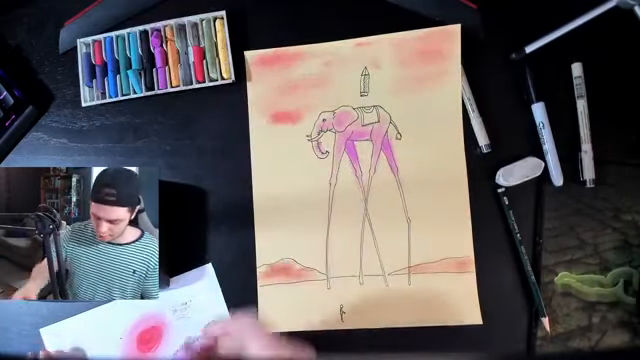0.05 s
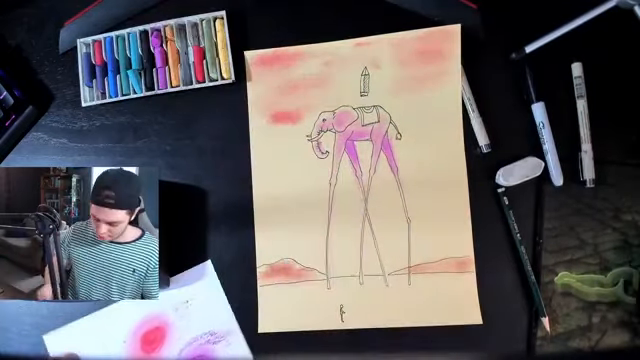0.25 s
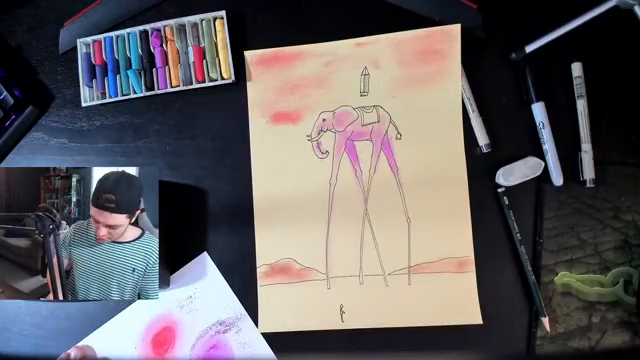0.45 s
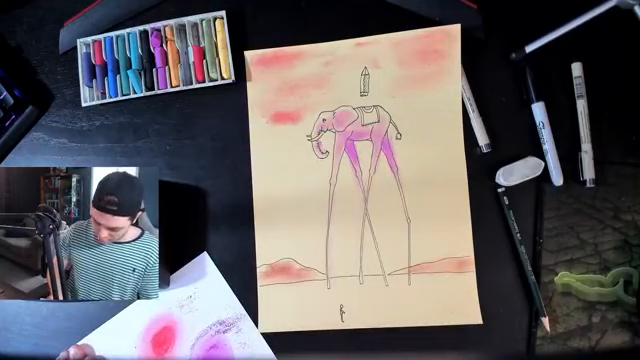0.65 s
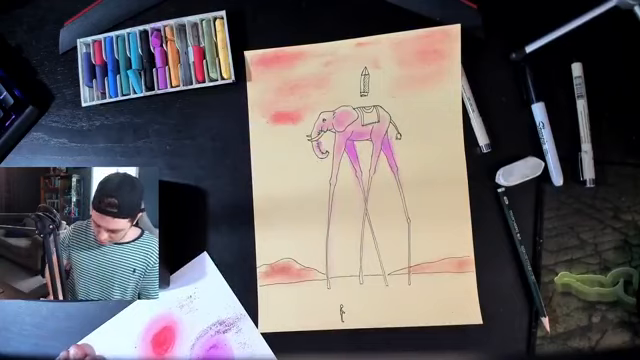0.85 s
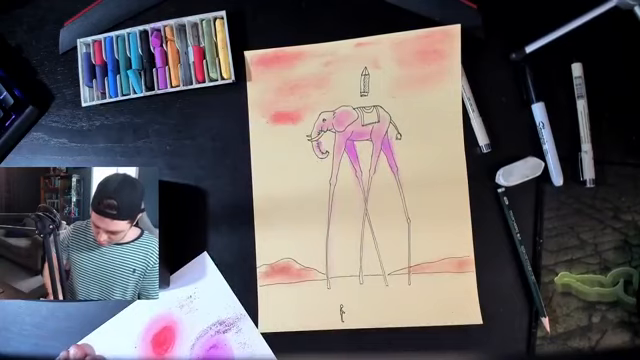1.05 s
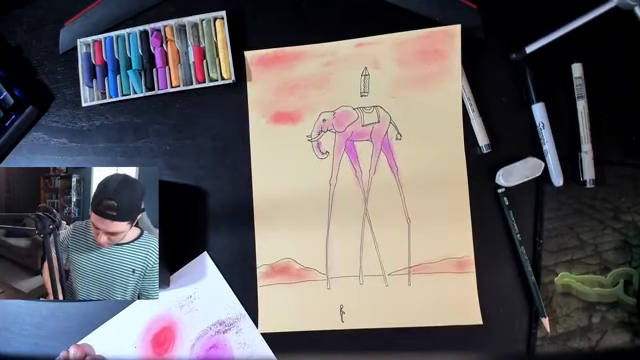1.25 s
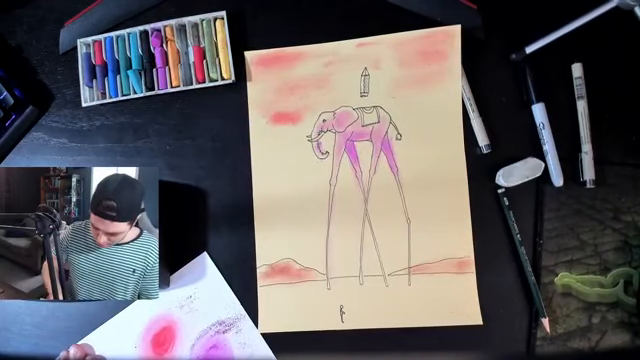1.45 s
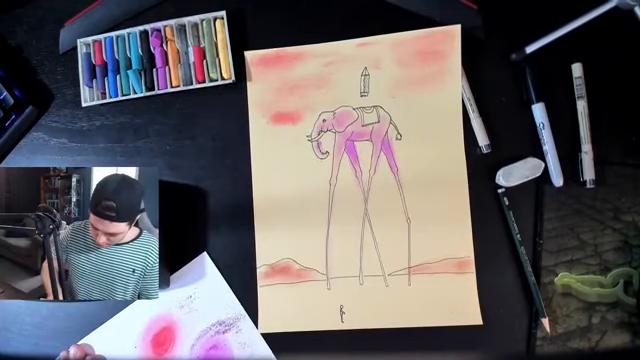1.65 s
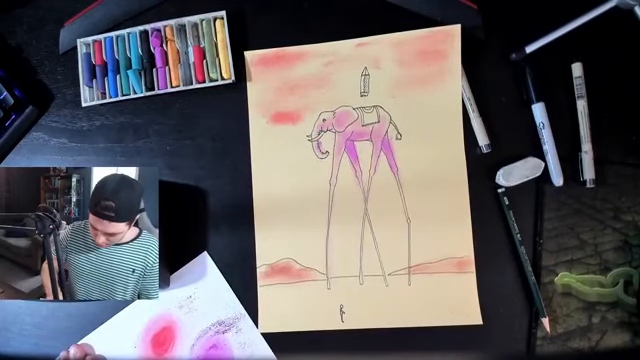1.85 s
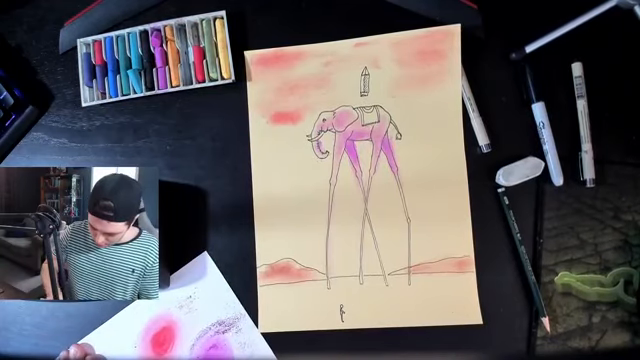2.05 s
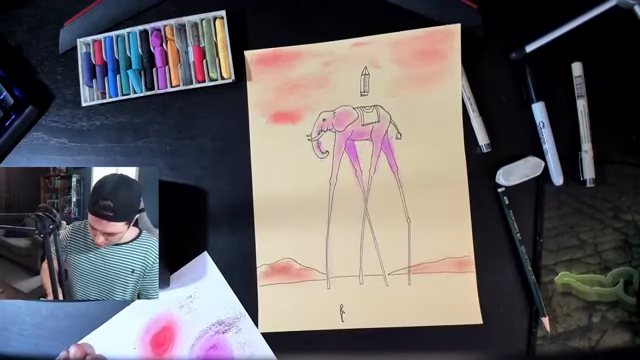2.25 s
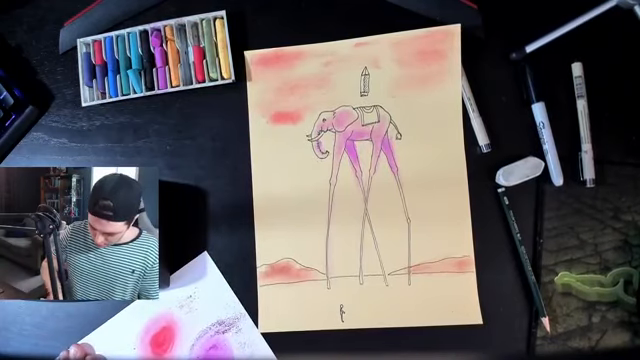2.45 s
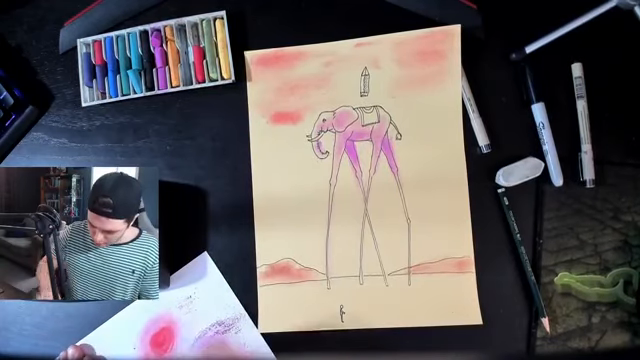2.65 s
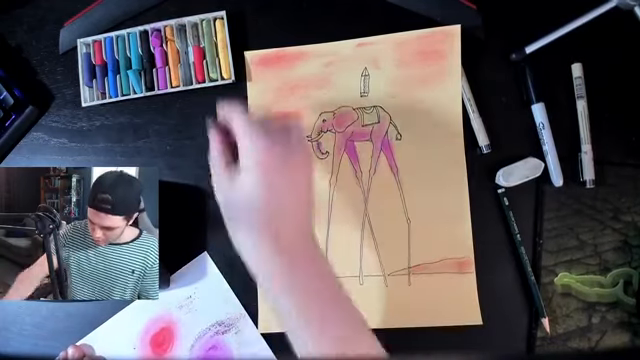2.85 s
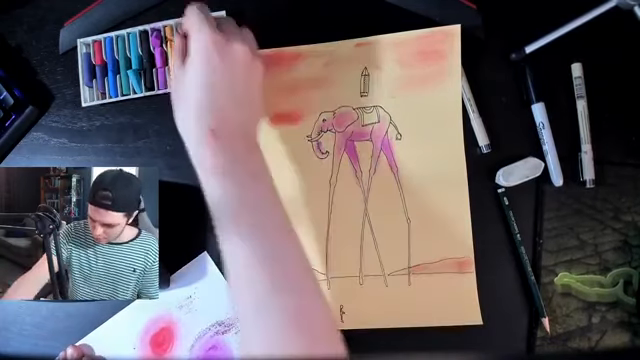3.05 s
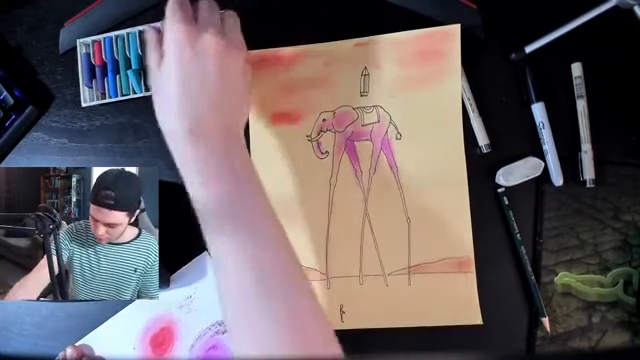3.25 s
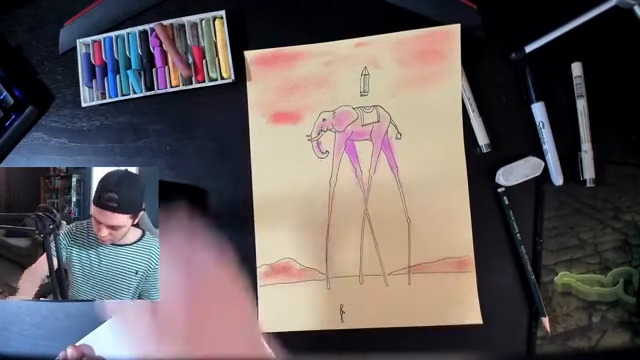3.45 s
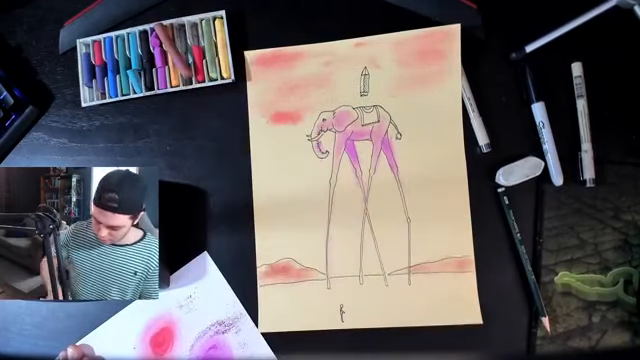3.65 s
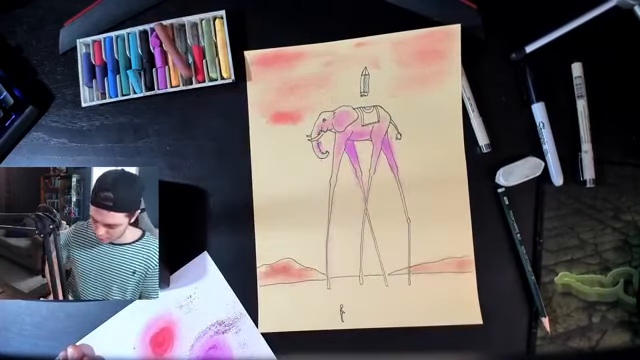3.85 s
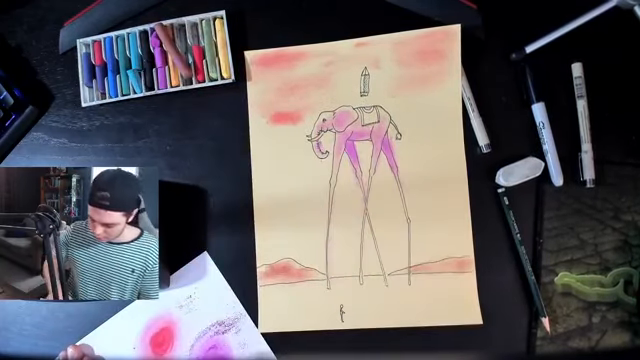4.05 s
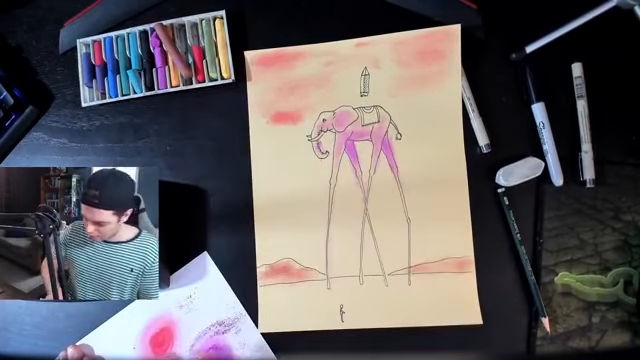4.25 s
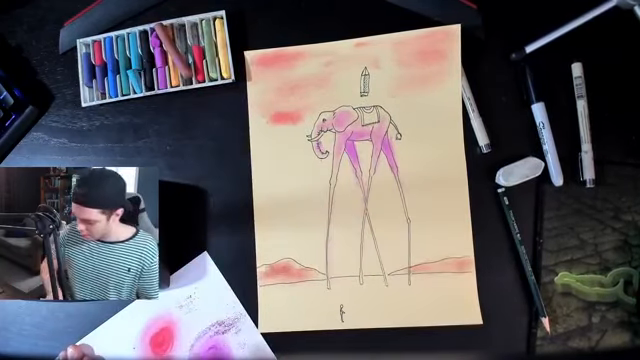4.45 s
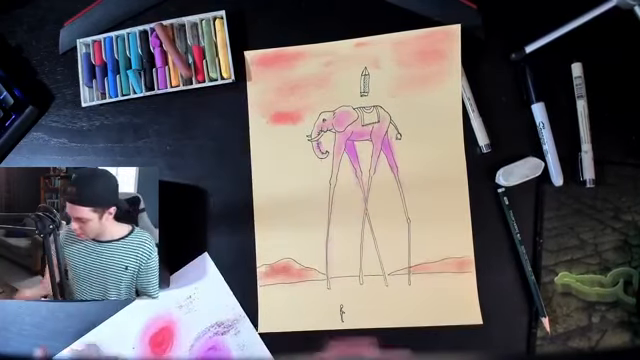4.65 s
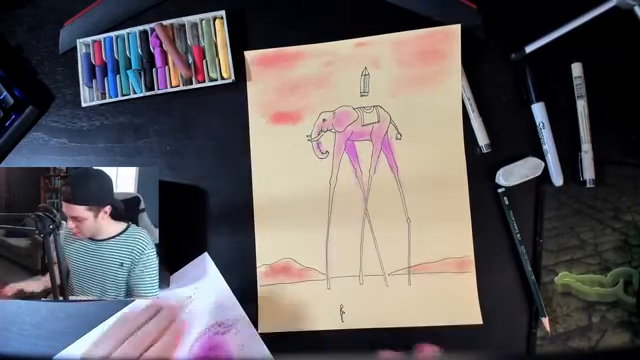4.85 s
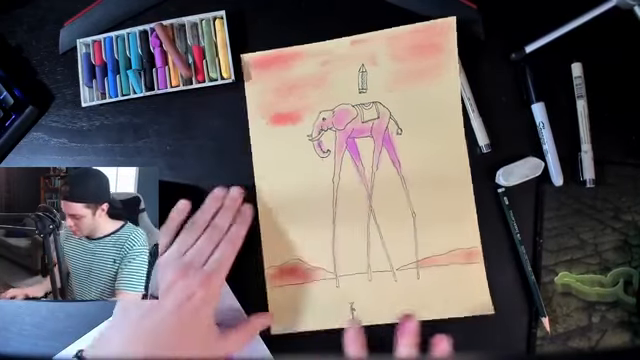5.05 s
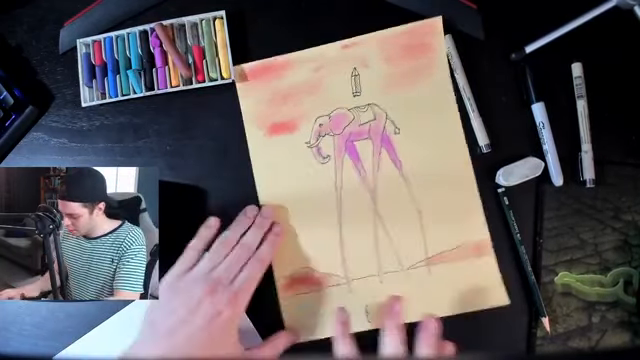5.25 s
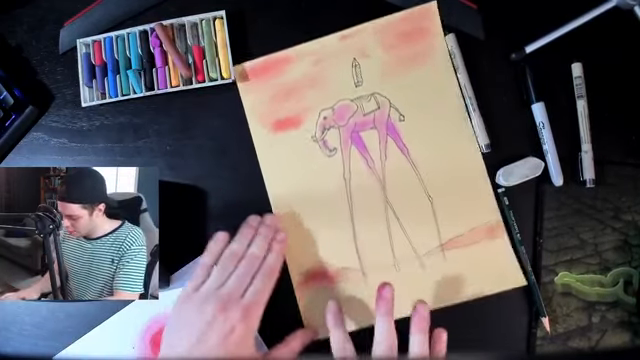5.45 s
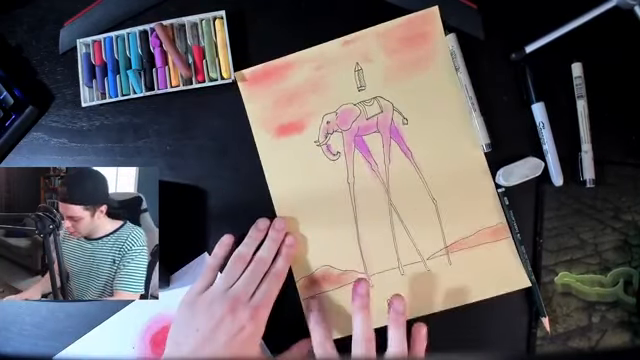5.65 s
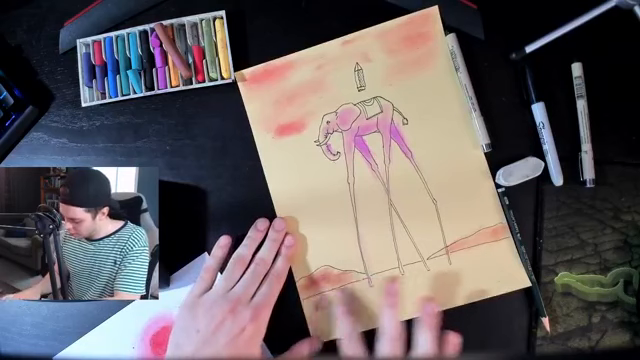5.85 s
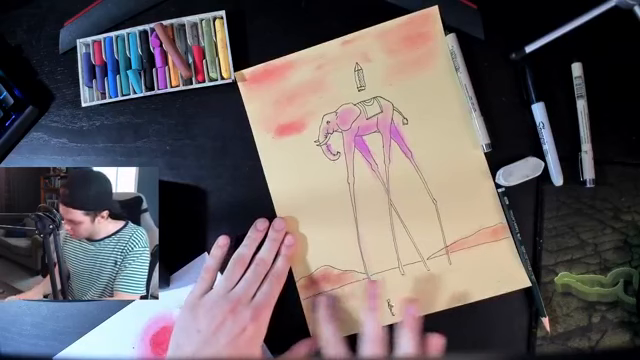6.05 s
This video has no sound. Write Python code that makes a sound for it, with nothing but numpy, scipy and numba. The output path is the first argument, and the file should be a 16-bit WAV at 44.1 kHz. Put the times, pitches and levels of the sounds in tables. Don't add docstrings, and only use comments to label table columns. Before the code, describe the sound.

A small quiet room, heard close to a desk, with a very faint fan and motor drone underneath. Around 0.25-0.6 s a sheet shifts with a soft dry scuff. From 0.6 to 2.6 s a chalky stick shades paper in rapid back-and-forth strokes, roughly eleven or twelve per second, starting faint and growing firmer and brighter; the scratchy grit carries a woody desk resonance, alternating higher and lower, with little knocks and ticks. A near-silent gap follows, with a tiny scuff at 2.84 s. At 3.2 s the stick touches its box, then cracks loudly at 3.25 s and bounces in a hollow, bright rattle, dying by 3.6 s. From 3.8 to 4.6 s a fingertip smudges in soft, airy, quick hisses, ending in a small flick and tick. From 5.04 s the sheet is turned, sliding in jerks with crisp creases and papery buckling, lighter toward 6 s.

```python
import sys
import numpy as np
from scipy import signal
from scipy.fft import rfft, irfft
from scipy.io import wavfile
from scipy.ndimage import uniform_filter1d, map_coordinates
from numba import njit

SR = 44100
rng = np.random.default_rng(int(sys.argv[2]) if len(sys.argv) > 2 else 0)


def materialize(psi):
    bounded = np.clip(np.atleast_2d(psi).T, -1, 1)
    quanta = np.round(bounded * 32767).astype(np.int16)
    wavfile.write(sys.argv[1], SR, quanta)


def boost_factor(decibels):
    exponent = np.asarray(decibels, float) / 20
    return 10 ** exponent


N = 269186


def unit(x):
    return x / np.sqrt(np.mean(x ** 2))


def band(x, lo, hi):
    return signal.sosfilt(signal.butter(3, [lo, hi], "band", fs=SR, output="sos"), x)


def body(spectrum, peaks=(), lift_db=8.):
    f = np.arange(1, 4098) * SR / 8194
    hz, db = np.transpose(spectrum)
    power = 1 + sum(boost_factor(gain + lift_db) ** 2 / (1 + (2 * (f - centre) / width) ** 2)
                    for centre, width, gain in peaks)
    colour = boost_factor(np.interp(np.log(f), np.log(hz), db))
    cepstrum = irfft(np.log(colour * np.sqrt(power)))
    cepstrum[1:4096] *= 2
    cepstrum[4097:] = 0
    return irfft(np.exp(rfft(cepstrum)))


def through(x, response):
    return signal.oaconvolve(x, response)[:N]


@njit
def svf(x, hz, q):
    y, bandpass, lowpass = np.empty(len(x)), 0., 0.
    for i in range(len(x)):
        g = np.tan(np.pi * hz[i] / SR)
        v = (bandpass + g * (x[i] - lowpass)) / (1 + g * (g + 1 / q))
        bandpass, lowpass, y[i] = 2 * v - bandpass, lowpass + 2 * g * v, v / q
    return y


def walk(rate):
    hold = int(SR / rate)
    levels = np.repeat(rng.standard_normal(N // hold + 1), hold)
    return 1.3 * uniform_filter1d(uniform_filter1d(levels, hold), hold)[:N]


def wander(x, spread_db, rate, width_hz):
    f, t, z = signal.stft(x, SR, nperseg=512)
    field = rng.standard_normal((200, 200))
    where = np.meshgrid(f / max(width_hz, 150), t * min(rate, 30), indexing="ij")
    patch = map_coordinates(field, where, order=1)
    return signal.istft(z * boost_factor(spread_db * patch), SR)[1][:N]


def swell(s, length):
    i = np.arange(int(s * SR), min(int((s + length) * SR), N))
    return i, np.abs(np.sin(np.pi * (i / SR - s) / length))


def grit(spread_db, patchy_db):
    sizes = boost_factor(spread_db * np.minimum(rng.exponential(size=N), 6))
    slips = rng.standard_normal(N) * sizes
    return unit(slips * boost_factor(patchy_db * (walk(60) + walk(250))))


def strokes(table, soft):
    t, power = np.arange(N) / SR, np.zeros((3, N))
    sheen_bite = 0.28
    for s, length, top, db, press_db, sheen_db in table:
        i = swell(s, length)[0]
        u, top = np.clip((t[i] - s) / length, 0, 1), np.clip(top, .03, .95)
        speed = np.sin(np.pi / 2 * np.where(u < top, u / top, (1 - u) / (1 - top)))
        levels = boost_factor(db + np.array([press_db, 0, sheen_db]))
        power[:, i] += np.outer(levels, speed ** soft) ** 2 * speed ** np.array([[0], [0], [sheen_bite]])
    return np.sqrt(power)


def rub(tooth, response, low, mid, high):
    steady, out = through(tooth, response), 0
    for gain, lo, hi in ((low, 500, 2550), (mid, 2550, 7250), (high, 7250, 17000)):
        out = out + band(through(tooth * gain, response), lo, hi) / np.std(band(steady, lo, hi))
    return out


def resonant_swells(table, q, skirt_q):
    tooth, out = grit(2.3, 0.79), np.zeros(N)
    for s, length, hz, db in table:
        i, shape = swell(s, length)
        centre = np.full(len(i), 1. * hz)
        tone = unit(svf(svf(tooth[i], centre, 1. * q), centre, 1. * skirt_q))
        out[i] += boost_factor(db) * np.sqrt(shape) * tone
    return out


def struck(events, modes, push_s):
    out, t = np.zeros(N + SR), np.arange(SR // 6) / SR
    for s, db in events:
        ring = 0
        for (hz, gain, t60), m in zip(modes, rng.standard_normal((len(modes), 2))):
            tone = np.sin(2 * np.pi * hz * (1 + 0.039 * m[1]) * t)
            ring = ring + boost_factor(gain + 5.5 * m[0]) * tone * 1000. ** (-t / t60)
        ring = ring * (1 - np.exp(-t / push_s))
        out[int(s * SR):int(s * SR) + len(t)] += boost_factor(db) * ring / np.abs(ring).max()
    return out[:N]


def bursts(events):
    shape, t = np.zeros(N + SR), np.arange(SR // 2) / SR
    for s, db, t60 in events:
        shape[int(s * SR):int(s * SR) + len(t)] += boost_factor(db) * 1000. ** (-t / max(t60, .003))
    return shape[:N] * rng.standard_normal(N)


# (frequency [Hz], level [dB])
RUMBLE = [(15, -11), (60, -17), (100, -27), (145, -13)]
# (frequency [Hz], level [dB])
HUSH = [(140, -30), (230, -6), (265, -6.5), (444, -5), (502, -8), (902, -8), (1290, -12), (1380, -15),
        (1870, -17), (2190, -20), (5000, -27), (16000, -35)]
# (frequency [Hz], width [Hz], level [dB])
FAN = [(115, 6.8, 5), (177, 6, -3), (214, 11, -3), (342, 27, -9.5), (440, 10, -5.5), (598, 3.9, 1)]
# (frequency [Hz], peak level [dB])
MOTOR = [(175.8, -73), (122, -81)]


def hush():
    air = through(rng.standard_normal(N), body(RUMBLE + HUSH[1:], FAN, lift_db=12.0))
    t, motor = np.arange(N) / SR, 0
    for hz, db in MOTOR:
        level = boost_factor(db + 1.0 * walk(11))
        motor = motor + level * np.sin(2 * np.pi * hz * t + 0.3 * walk(8.))
    return boost_factor(-71.5 + 0.5 + 0.58 * walk(2.3)) * unit(air) + motor


# (start [s], duration [s], share to top speed [-], level [dB], pressure [dB])
DRAGS = [(0.0, 0.15, 0.12, -72, -9), (0.236, 0.055, 0.25, -70, 0.5), (0.255, 0.27, 0.27, -53.5, -3.5),
         (0.358, 0.27, 0.37, -60, -1.5), (2.568, 0.1, 0.17, -65, -2), (3.18, 0.022, 0.56, -67, -10),
         (5.036, 0.1, 0.056, -49.5, -20), (5.098, 0.19, 0.26, -51, -37), (5.257, 0.14, 0.35, -48.5, -20),
         (5.318, 0.14, 0.45, -44.5, -20.5), (5.401, 0.13, 0.35, -56, -24), (5.494, 0.048, 0.36, -48.5, -19),
         (5.47, 0.26, 0.27, -57.5, -17), (5.639, 0.16, 0.15, -77, -14.5), (5.844, 0.15, 0.54, -56, -7),
         (5.986, 0.13, 0.2, -55, -11)]
# (frequency [Hz], level [dB])
SHEET = [(530, -43.5), (900, -19), (1040, -16), (1600, -16.5), (2220, -6.5), (3000, -2.5), (3680, -4.5),
         (6250, 2.5), (6800, 0), (11700, -11.5), (16000, -31.5)]


def sheet():
    sheen_db = -2.5
    gains = strokes([(*row, sheen_db) for row in DRAGS], soft=1.75)
    return wander(rub(grit(2.3, 0.79), body(SHEET), *gains), 1.9, 7.8, 590.0)


# (start [s], duration [s], frequency [Hz], level
# [dB])
NARROW_SWELLS = [(0, 0.17, 9500, -77.5), (2.837, 0.028, 1780, -72), (2.838, 0.032, 4370, -79),
                 (2.803, 0.01, 9200, -82), (2.99, 0.01, 9300, -83), (3.096, 0.014, 6980, -78),
                 (3.096, 0.016, 3500, -78), (3.595, 0.16, 3500, -85), (3.53, .035, 600, -60),
                 (3.575, .12, 590, -68), (3.44, .09, 1450, -56), (3.5, .12, 1600, -62), (3.6, 0.17, 1650, -70),
                 (3.56, .12, 1000, -66), (3.33, .03, 1150, -50), (3.68, .08, 700, -72),
                 (4.272, 0.054, 1270, -67.5), (3.8, .1, 2920, -76.5), (4.1, .4, 2360, -76),
                 (5.02, .035, 1400, -73), (4.633, 0.063, 1390, -64.5), (4.927, 0.084, 1377, -71),
                 (3.79, .06, 6800, -76), (4.01, .07, 6300, -66), (4.02, .08, 9700, -67), (4.13, .08, 9300, -64),
                 (4.24, .07, 9400, -63), (4.345, .065, 9300, -59), (4.33, .05, 5000, -66), (4.435, .06, 9200, -63),
                 (4.66, .06, 4200, -70), (4.693, .013, 2600, -62), (4.643, .014, 6700, -60)]
# (start [s], duration [s], frequency [Hz], level [dB])
SHEENS = [(0, .12, 13000, -82), (4.13, .09, 14000, -74), (4.24, .075, 14000, -72), (4.34, .075, 14000, -70),
          (4.44, .065, 14000, -70.5), (4.535, .045, 14000, -78), (5.5, .16, 12000, -75),
          (5.86, 0.11, 13000, -68), (5.99, 0.11, 12900, -69), (3.186, .013, 6500, -58),
          (3.604, .012, 11000, -79), (3.561, .012, 11000, -77)]


def noise_swells():
    return resonant_swells(NARROW_SWELLS, q=8., skirt_q=8.) + resonant_swells(SHEENS, q=2.7, skirt_q=.6)


# (time [s], peak level [dB])
TICKS = [(0.019, -33), (0.2456, -32.5), (1.4344, -34), (1.5275, -28), (1.6067, -30), (1.946, -28),
         (2.2837, -28), (2.8404, -45), (3.1024, -62), (4.4444, -29), (4.6462, -24.5), (4.681, -39),
         (4.6986, -30), (5.0404, -23), (5.0604, -25), (5.1397, -41), (5.215, -29.5), (5.2949, -38),
         (5.3194, -30), (5.362, -26), (5.3915, -24), (5.503, -27), (5.6406, -32), (5.8576, -38),
         (5.9958, -31)]


def creases():
    return band(bursts([(s, db - 19.0, 0.024) for s, db in TICKS]), 1600, 9000)


# (start [s], duration [s], frequency [Hz], level [dB])
BUCKLES = [(0.267, 0.32, 4530, -61.5), (0.269, 0.14, 4000, -56), (5.049, 0.66, 11600, -68.5),
           (5.04, 0.066, 3070, -63), (5.13, 0.06, 3100, -51.5), (5.135, 0.046, 2500, -56.5),
           (5.278, 0.142, 5900, -49), (5.28, 0.07, 4700, -58.5), (5.35, 0.074, 4300, -57),
           (5.495, 0.035, 5700, -55), (5.501, 0.051, 3020, -58.5), (5.605, 0.075, 2550, -66),
           (5.618, 0.085, 5200, -59), (5.72, 0.07, 5070, -82), (5.849, 0.12, 8600, -57.5),
           (5.856, 0.14, 5080, -65.5), (5.99, 0.11, 2950, -64.5), (5.989, 0.089, 8500, -54.5),
           (5.87, 0.11, 2760, -75), (5.995, 0.084, 5060, -67), (5.625, .04, 4650, -64),
           (5.24, .05, 6300, -59), (5.3, .04, 4700, -58), (5.525, 0.04, 3250, -61), (5.36, .07, 3150, -56),
           (5.28, .05, 6400, -56), (5.355, .06, 6450, -54), (5.4, .06, 2140, -71), (5.56, .14, 8240, -66)]


def buckles():
    return resonant_swells(BUCKLES, q=9., skirt_q=.6)


# (time [s], peak level [dB], thump [dB], ring [dB])
BUMPS = [(0.288, -62.5, 3, 20), (0.563, -38, -23, -7), (1.011, -54, -17.5, 18), (0.574, -46, -23, -14),
         (1.257, -44, -18.5, -2), (1.451, -48.5, -32, 22), (1.606, -56, 4, 33), (1.631, -48, -20, 5),
         (1.687, -53, -13, -6), (1.769, -63.5, 5.5, 30), (1.805, -43.5, -19, 2), (1.936, -65, 0, 12),
         (1.977, -45, -19, 12), (2.12, -48.5, -37, 32.5), (2.128, -36.5, -10, 21.5),
         (2.213, -49.5, -24.5, -15), (2.28, -43, -18, 2), (2.379, -67.5, -13, -3), (2.473, -45.5, -18, 3),
         (2.56, -46, -30, -5)]
# (frequency [Hz], level [dB], t60 [s])
BUMP_MODES = [(335, -10, 0.08), (435, -12.5, 0.071), (697, -13, 0.057), (881, -7, 0.063), (1057, -6, 0.062)]
# (frequency [Hz], level [dB], t60 [s])
RING_MODES = [(1282, -2, 0.075), (1546, 0, 0.088), (1820, -7, 0.031), (2910, -2, 0.018)]
# (frequency [Hz], level [dB], t60 [s])
THUMP_MODES = [(40, -6, 0.12), (128.3, 10, 0.093)]


def bumps():
    knock = struck([(s, db - 3.0) for s, db, _, _ in BUMPS], BUMP_MODES, push_s=0.00091)
    crunch = band(bursts([(s, db + 8.0, .065) for s, db, _, _ in BUMPS]), 550, 1490)
    thump = struck([(s, db + rel) for s, db, rel, _ in BUMPS], THUMP_MODES, push_s=0.011)
    ring = struck([(s, db + rel - 9) for s, db, _, rel in BUMPS], RING_MODES, push_s=0.00034)
    return knock + crunch + thump + ring


# (start [s], share to top speed [-], level [dB], pressure [dB])
STROKES = [(0.561, 0.62, -73, 5.5), (0.631, 0.59, -64, 1), (0.695, 0.28, -58, 2), (0.795, 0.2, -50, -4.5),
           (0.876, 0.5, -49, -4.5), (0.998, 0.5, -49.5, -1), (1.075, 0.67, -50, -6),
           (1.203, 0.42, -48.5, -1.5), (1.313, 0.57, -47.5, -7.5), (1.411, 0.51, -48, -3),
           (1.505, 0.34, -45.5, -12.5), (1.601, 0.2, -45, 0), (1.673, 0.52, -47.5, -8),
           (1.763, 0.3, -46, -1), (1.842, 0.34, -47.5, -3.7), (1.938, 0.22, -44.5, -1),
           (2.019, 0.36, -45, -6), (2.107, 0.36, -40.5, -1.5), (2.186, 0.34, -45, -14),
           (2.278, 0.27, -45.5, -9.5), (2.361, 0.45, -45.5, -6), (2.442, 0.58, -43, -11),
           (2.522, 0.35, -39.5, -11.5)]
# (frequency [Hz], level [dB])
STICK = [(290, -36), (500, -16), (1030, -1.5), (1260, -5), (2130, -9), (2360, -1), (2570, -12), (4400, -14),
         (9220, -17), (16000, -37)]
# (frequency [Hz], width [Hz], level [dB])
DESK = [(1287, 30, 5), (1558, 100, 1), (1837, 43, 3), (2028, 44, -3.5), (2357, 46, -14), (2910, 62, -8),
        (3370, 150, -12), (3500, 16, -7), (4385, 520, -8), (5700, 400, -10.5), (6550, 160, -10.5),
        (9660, 500, -15)]


def pastel():
    s, top, db, press_db = np.transpose(STROKES)
    lift_s = 2.609
    length = np.diff(s, append=lift_s) + np.interp(s, [s[0], 1.41], [0.042, 0.004])
    age = s - s[0]
    sheen_db = np.minimum(-10.5 + 12 * age, -59 + 5.5 * age - db)
    gains = strokes(zip(s, length, top, db, press_db, sheen_db), soft=1.0)
    tooth = grit(2.5, 0.81)
    rubbed = wander(rub(tooth, body(STICK, DESK, lift_db=16.5), *gains), 2.6, 14., 249.6)
    note_hz, note_q = 2355, 45.
    note = svf(tooth * gains[1], np.full(N, 1. * note_hz), note_q) * np.sqrt(SR * note_q / note_hz / np.pi)
    return rubbed + boost_factor(-13) * note


# (start [s], duration [s], frequency [Hz], level [dB])
EDGES = [(.8, .07, 4400, -60), (.89, .09, 4400, -56), (.93, .05, 1800, -56), (1.02, .05, 1250, -57),
         (1.11, .08, 4500, -57), (1.23, .07, 3500, -58), (1.335, .065, 4400, -57), (1.425, .05, 1280, -54),
         (1.512, .07, 4400, -52), (1.6, .05, 1500, -49), (1.6, .04, 3500, -56), (1.69, .06, 4400, -56),
         (1.77, .06, 1400, -55), (1.86, .06, 4300, -57), (1.95, .06, 3300, -57), (2.04, .05, 4400, -57),
         (2.115, .04, 1450, -46), (2.2, .06, 4350, -55), (2.29, .06, 4300, -56), (2.38, .05, 4300, -57),
         (2.46, .05, 4500, -55), (2.535, .05, 4050, -51)]


def stick_edge():
    return resonant_swells(EDGES, q=6., skirt_q=.6)


# (time [s], peak level [dB], crack t60 [s], bright [dB], dull [dB])
DROPS = [(3.1992, -23.5, 0.18, -29.5, -20), (3.247, -9, 0.1, -5.5, -21), (3.258, -30, 0.11, -6.5, -24),
         (3.272, -24, 0.09, -18, -18), (3.289, -30, 0.05, -19.5, -22), (3.3039, -33, 0.11, -22, -8),
         (3.3308, -33, 0.16, -15.5, -6), (3.3589, -15.5, 0.073, -25.5, -28.5),
         (3.373, -30, 0.048, -27, -11), (3.3848, -19, 0.05, -20, -26), (3.398, -30, 0.15, -19, -7),
         (3.4393, -21, 0.046, -25, -37), (3.449, -36, .06, -20, -20), (3.5107, -37.5, 0.1, -26, -4.5),
         (3.515, -40, .06, -20, -10), (3.523, -43, 0.13, -20, -10), (3.541, -46, 0.11, -30, -8),
         (3.5634, -47.5, 0.09, -12, -5.5), (3.607, -58, 0.04, -14, -15)]
# (frequency [Hz], level [dB])
CLACK = [(350, -56), (600, -26), (1220, -6), (1380, -8), (1920, -4), (3210, -1), (3960, -2), (8260, -7),
         (12700, -31.5), (16500, -51)]
# (frequency [Hz], width [Hz], level [dB])
BOX = [(2048, 74, -1), (2888, 200, -3), (3110, 95, -7), (4510, 210, -7), (4730, 520, -5.5),
       (5820, 400, -3.5), (6830, 820, -7)]


def bounces():
    tray = body(CLACK, BOX, lift_db=10.5)
    blows = [(s, db - 13.0, t60) for s, db, t60, _, _ in DROPS]
    blows += [(s + 0.00049, db - 9.5, .015) for s, db, *_ in DROPS]
    crack = through(bursts(blows), tray / np.linalg.norm(tray))
    bright = band(bursts([(s, db + rel, 0.86 * t60) for s, db, t60, rel, _ in DROPS]), 5000, 9800)
    dull = band(bursts([(s, db + rel + 9.5, 0.28 * t60) for s, db, t60, _, rel in DROPS]), 1050, 2000)
    return crack + bright + dull


def shaken(level_db, slope, rise_s, t60):
    power, top_db = np.zeros(N), max(row[1] for row in DROPS)
    for s, db, *_ in DROPS:
        i = np.arange(int(s * SR), int(s * SR) + SR // 2)
        age = i / SR - s + 1 / SR
        build = 1 - np.exp(-age / rise_s) if rise_s else 1
        power[i] += (boost_factor(slope * (db - top_db)) * build ** 2 * 1000. ** (-age / t60)) ** 2
    return boost_factor(level_db) * np.sqrt(power / power.max())


def jolted_box():
    hollow_hz = 1133 - 160 * np.exp(-((np.arange(N) / SR - 3.29) / 0.031) ** 2)
    jolt = rng.standard_normal((5, N))
    tray = unit(wander(band(jolt[0], 1400, 1850), 3.4, 6.3, 140.0))
    hollow = unit(svf(svf(jolt[1], hollow_hz, 16.), hollow_hz, 8.))
    rattle = unit(band(jolt[2], 400, 930))
    top = unit(band(band(jolt[3], 150, 420), 130, 600))
    fizz = unit(band(jolt[4], 8500, 12700) + boost_factor(-19) * band(jolt[4], 13000, 16400))
    out = shaken(level_db=-49, slope=0.8, rise_s=0.004, t60=0.45) * tray
    out += shaken(level_db=-43, slope=1.7, rise_s=0.045, t60=0.37) * hollow
    out += shaken(level_db=-53.5, slope=0.6, rise_s=0, t60=0.7) * rattle
    out += shaken(level_db=-47, slope=1.8, rise_s=0.06, t60=0.25) * top
    return out + shaken(level_db=-50, slope=.7, rise_s=.001, t60=.16) * fizz


# (time [s], frequency [Hz], peak level [dB], t60 [s])
PINGS = [(3.2, 2910, -33, .03), (3.225, 2900, -48, .08), (3.2471, 4800, -18, .012),
         (3.2472, 7190, -15.5, 0.019), (3.2471, 2815, -24, 0.016), (3.249, 3160, -32, .05),
         (3.249, 4560, -31, .09), (3.273, 5800, -25, .03), (3.274, 4500, -27, .03), (3.289, 5100, -31, .02),
         (3.331, 5700, -36, .03), (3.331, 3900, -38, .03), (3.385, 4500, -30, .02),
         (3.386, 3000, -31, .025), (3.399, 4500, -36, .02), (3.6075, 4300, -60, .02),
         (3.5645, 6800, -52, .02), (3.359, 2740, -30, .02), (3.359, 5900, -27, .018),
         (3.369, 3250, -30, .035), (3.385, 1980, -32, .025), (3.4391, 2126, -33, .03),
         (3.4402, 4570, -30, .02), (3.4405, 6300, -27, .015), (3.4393, 2730, -36.5, .03),
         (3.511, 2070, -43, .1), (3.511, 3250, -50, .04), (3.515, 5010, -49, 0.053),
         (3.524, 2200, -50, .06), (5.0404, 3100, -43, .03), (5.0424, 2200, -52, 0.017),
         (5.0602, 2980, -41, .025), (5.0612, 6300, -46, .03), (5.075, 3000, -53, 0.027),
         (5.088, 3000, -49, .03), (5.1, 3050, -48, .03), (5.1166, 3000, -50, .04), (5.156, 2950, -36, .04),
         (5.16, 2400, -48, .04), (5.212, 2050, -54, .025), (5.212, 3000, -51, .03),
         (5.2952, 6100, -39, .04), (5.6399, 4900, -48, .04)]


def pings():
    out, wobble = np.zeros(N), boost_factor(2.5 * walk(400))
    for s, hz, db, t60 in PINGS:
        i = np.arange(int(s * SR), int(s * SR) + SR // 5)
        age = i / SR - s
        envelope = 1000. ** (-age / max(t60, .004)) * (1 - np.exp(-age / 0.00046))
        out[i] += boost_factor(db) * np.sin(2 * np.pi * hz * age) * envelope
    return out * wobble


# (start [s], duration [s], frequency [Hz], peak level [dB])
BOOMS = [(3.202, 0.022, 220, -51), (3.243, 0.036, 225, -34.5), (3.26, 0.02, 305, -33),
         (3.275, 0.034, 318, -30), (3.265, 0.05, 420, -46), (3.23, 0.11, 42, -64), (3.24, .1, 72, -66),
         (3.33, .12, 50, -75), (3.3, .065, 135, -47), (3.245, .05, 145, -52), (3.36, .045, 135, -52),
         (3.385, .04, 255, -54), (3.5, .03, 140, -70), (3.35, 0.032, 203, -45), (3.362, 0.024, 120, -64),
         (3.44, 0.032, 206, -55), (3.505, 0.04, 255, -60)]


def booms():
    out = np.zeros(N)
    for s, length, hz, db in BOOMS:
        i, shape = swell(s, length)
        out[i] += boost_factor(db) * shape * np.sin(2 * np.pi * hz * (i / SR - s))
    return out


# (start [s], duration [s], share to top speed [-], level [dB], pressure [dB])
SMUDGE = [
    (3.782, 0.14, 0.45, -68, -17.5),
    (3.891, 0.157, .39, -61.5, -15),
    (3.992, 0.15, .39, -59.5, -12.5),
    (4.108, 0.14, 0.38, -59.5, -11.5),
    (4.227, 0.13, 0.27, -58.5, -6),
    (4.316, 0.115, 0.48, -54.5, -12),
    (4.423, 0.1, .25, -57, -10.5),
    (4.521, 0.072, 0.42, -60.5, -7.5),
    (4.57, 0.062, .2, -70, -2),
]
# (start [s], duration [s], level [dB], pressure [dB])
FLICK = [
    (4.625, 0.064, -59.5, -14),
    (4.647, 0.1, -69.5, 1.5),
]
# (frequency [Hz], level [dB])
FINGER = [(530, -55), (900, -25), (1500, -18.5), (2500, -13), (3500, -4.5), (6000, -3), (9600, -7.5),
          (11000, -12), (16000, -26.5)]
# (frequency [Hz], width [Hz], level [dB])
FINGER_RINGS = [(2350, 55, 2), (1850, 43, -13), (4660, 180, -8), (6370, 133, -7), (8850, 350, -3),
                (9730, 400, -4)]


def finger():
    rows = []
    for s, length, top, db, press_db in SMUDGE:
        rows.append((s, length, top, db, press_db, 4.5 + 0.9 * min(db + 58., 0)))
    for s, length, db, press_db in FLICK:
        rows.append((s, length, 0.39, db, press_db, -7.5))
    gains = strokes(rows, soft=1.14)
    hiss = rub(grit(1.8, 0.69), body(FINGER, FINGER_RINGS, lift_db=5.0), *gains)
    return wander(hiss, 2.6, 11., 600.)


def room(desk):
    t = np.arange(SR // 2) / SR
    air = rng.standard_normal(len(t)) * (t > .006)
    dull = signal.lfilter(*signal.butter(2, 2600, fs=SR), air)
    tail = dull * 1000. ** (-t / 0.25) + boost_factor(-2) * (air - dull) * 1000. ** (-t / .19)
    return boost_factor(-15) * through(desk, tail / np.linalg.norm(tail))


def scene():
    desk = sheet() + noise_swells() + creases() + buckles() + bumps() + pastel() + stick_edge()
    desk += bounces() + jolted_box() + pings() + booms() + finger()
    return (desk + room(desk) + hush())[None]


def top_cut(x):
    return signal.sosfilt(signal.butter(12, 15800, fs=SR, output="sos"), x)


def record(dry):
    return top_cut(dry)


dry = scene()
out = record(dry)
materialize(out)
```